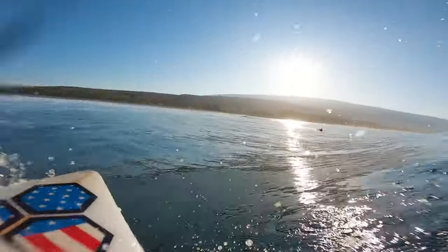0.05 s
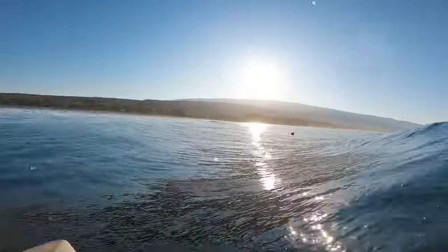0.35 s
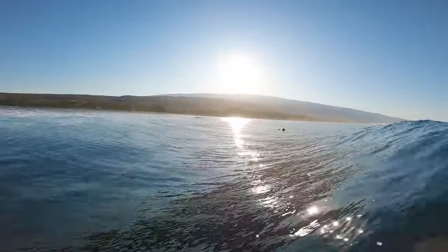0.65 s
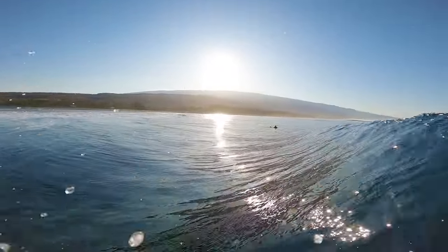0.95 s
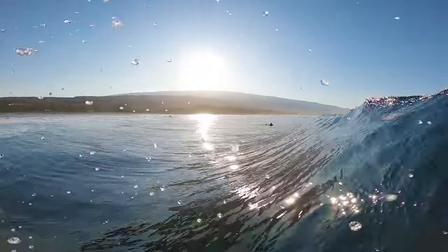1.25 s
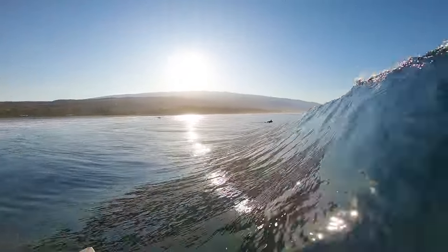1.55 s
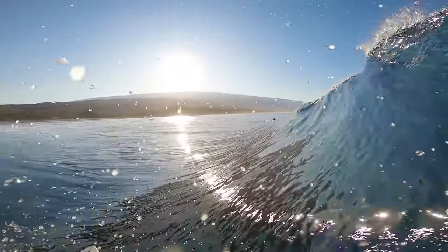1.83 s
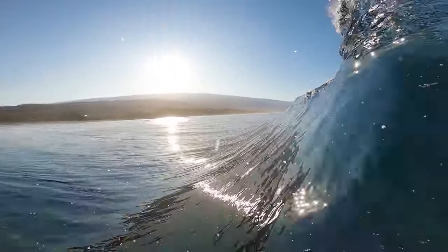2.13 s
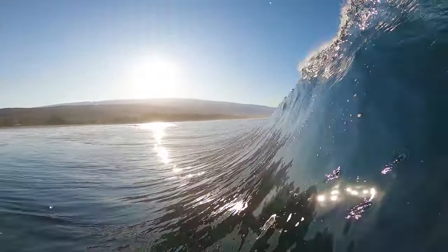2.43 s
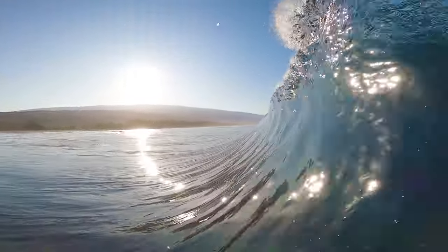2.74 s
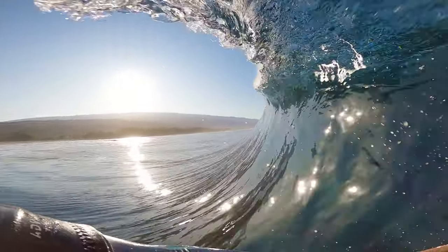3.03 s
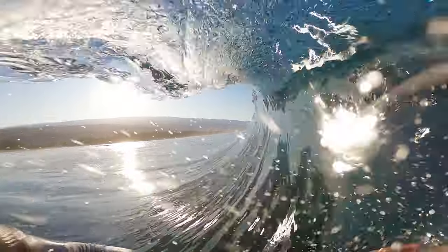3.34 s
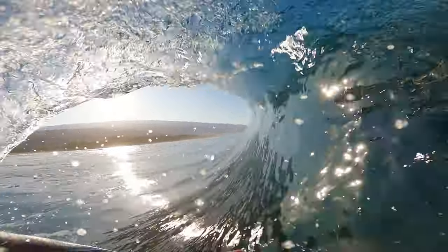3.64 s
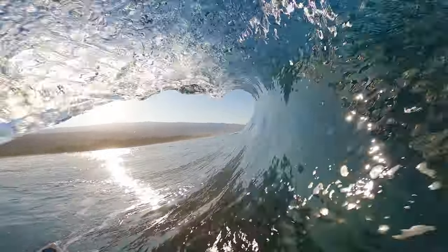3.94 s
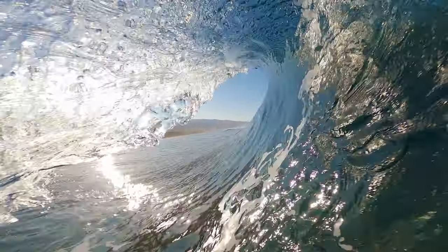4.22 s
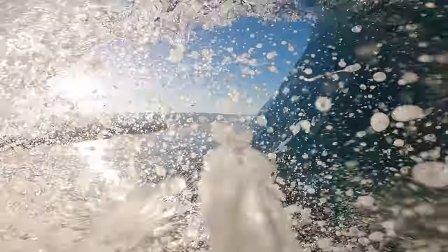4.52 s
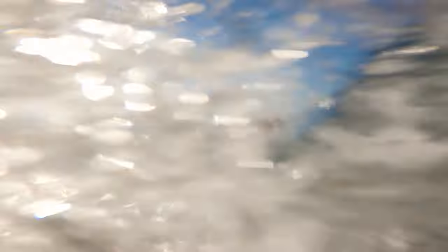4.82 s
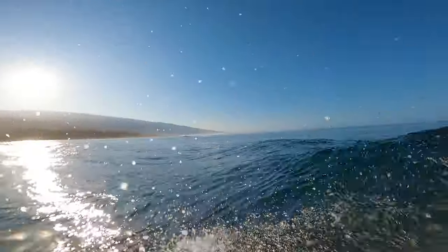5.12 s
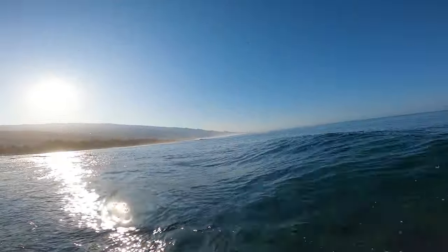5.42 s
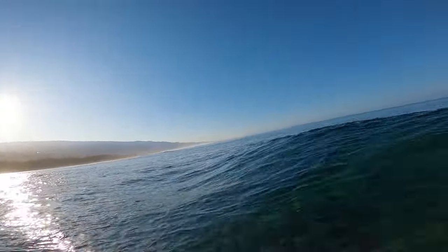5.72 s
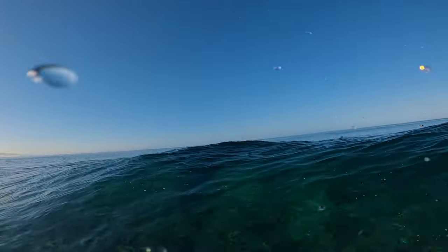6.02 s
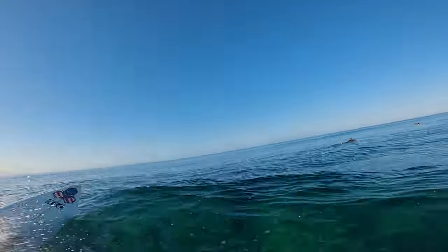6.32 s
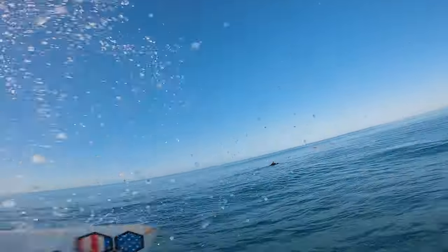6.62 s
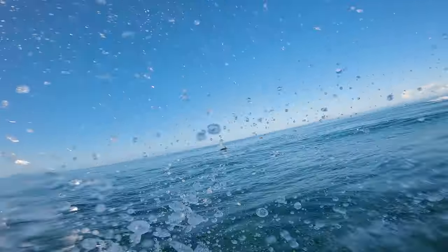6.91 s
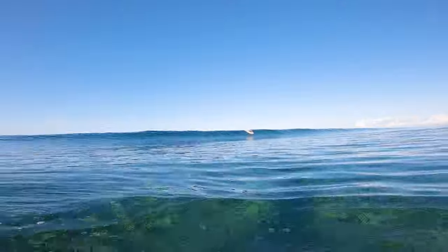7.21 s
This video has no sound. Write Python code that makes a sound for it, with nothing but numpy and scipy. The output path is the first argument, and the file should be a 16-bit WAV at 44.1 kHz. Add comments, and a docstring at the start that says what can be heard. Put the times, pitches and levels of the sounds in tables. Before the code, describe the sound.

Rushing, gurgling seawater and thumping wind on a surfer's camera, with splashes, gulps and drops hitting the wet microphone.

```python
"""Wind thumps and water gulps at the wet microphone port of a camera riding a wave with a surfer.
In the tube the wave face churns, foam fizzes, and sheets of water and single drops hit the housing.
Trapped air rings in gulps and glugs; draining water forms hollow, ringing pockets.
The lip falls on the housing, a calm glide over the shoulder follows, and a last turn throws up spray."""
import sys
import numpy as np
from scipy import signal
from scipy.fft import rfft, irfft, next_fast_len
from scipy.io import wavfile
from scipy.ndimage import uniform_filter1d, minimum_filter1d

SR = 44100
rng = np.random.default_rng(int(sys.argv[2]) if len(sys.argv) > 2 else 0)


def inscribe(sig):
    """Save sig as 16-bit PCM at rate SR to the path in sys.argv[1].

    A 1-D sig is mono; a 2-D sig holds one channel per row.
    Samples are clipped to [-1, 1] before scaling.
    """
    pcm = np.round(np.clip(np.atleast_2d(sig).T, -1, 1) * 32767)
    wavfile.write(sys.argv[1], SR, pcm.astype(np.int16))


N = 328986
T = np.arange(N) / SR


def from_db(db):
    """Decibels to gain."""
    return 10 ** (np.asarray(db) / 20)


def unit_rms(x):
    """Scale to unit power."""
    return x / np.sqrt(np.mean(x ** 2) + 1e-20)


def curves(rows):
    """Breakpoints to one per-sample curve per column."""
    times_s, *columns = np.transpose(rows)
    return [np.interp(T, times_s, column) for column in columns]


def swells(rows):
    """Sum of Gaussian bells, one curve per column of heights."""
    centre_s, half_length_s, *heights = np.transpose(rows)
    coarse_s = T[::40]
    bells = np.exp(-((coarse_s[:, None] - centre_s) / half_length_s) ** 2)
    return [np.interp(T, coarse_s, bells @ height) for height in heights]


def add(out, start_s, sound):
    """Mix a short sound in at start_s."""
    at = int(np.clip(round(start_s * SR), 0, N - 1))
    out[at:at + len(sound)] += sound[:N - at]


def colour(x, spectrum):
    """Shape by a spectrum, rolling off beyond its ends; unit power."""
    size = next_fast_len(N)
    hz, db = np.transpose(spectrum)
    bin_hz = np.maximum(np.arange(size // 2 + 1) * SR / size, 1)
    gain = from_db(np.interp(np.log(bin_hz), np.log(hz), db))
    skirts = np.minimum(1, hz[-1] / bin_hz) ** 2 * np.minimum(1, bin_hz / hz[0])
    return unit_rms(irfft(rfft(x, size) * gain * skirts, size)[:N])


def drift(rate_hz):
    """Slow random wander, unit spread."""
    hop, settle = 40, 2000
    pole = np.exp(-2 * np.pi * hop * rate_hz / SR)
    noise = rng.standard_normal(N // hop + settle + 2)
    slow = signal.lfilter([1], [1, -2 * pole, pole * pole], noise)[settle:]
    return np.interp(np.arange(N) / hop, np.arange(len(slow)), unit_rms(slow))


def steady(x, span_s):
    """Level the power over span_s; faster grain stays."""
    power = uniform_filter1d(x ** 2, max(int(span_s * SR), 2))
    return x / np.sqrt(np.maximum(power, 1e-9))


def blend(first, second, share):
    """Equal-power mix; share belongs to the first."""
    share = np.clip(share, 0, 1)
    return np.sqrt(share) * first + np.sqrt(1 - share) * second


def eddies(spectrum, rate_hz, lumpy_db):
    """Turbulence: noise in lumps."""
    return colour(rng.standard_normal(N) * from_db(lumpy_db * drift(rate_hz)), spectrum)


def impacts(per_s, spread_db):
    """Random clicks, many small, few large."""
    out = np.zeros(N)
    at = rng.integers(0, N, int(per_s * N / SR))
    level_db = spread_db * np.minimum(rng.exponential(1, len(at)), 4)
    out[at] = from_db(level_db) * rng.choice([-1, 1], len(at))
    return out


def bubbles(low_hz, high_hz, per_s, cycles, spread_db, sizes=20):
    """Bubble cloud; each rings down 60 dB in the given cycles. Unit power."""
    births = impacts(per_s, spread_db)
    size_index = rng.integers(0, sizes, N)
    out = np.zeros(N)
    for k, hz in enumerate(np.geomspace(low_hz, high_hz, sizes)):
        cosine = np.cos(2 * np.pi * hz / SR)
        r = np.exp(-np.log(1000) * hz / (cycles * SR))
        kicks = births * (size_index == k) + 1e-18
        out += hz * signal.lfilter([1, -r * cosine], [1, -2 * r * cosine, r * r], kicks)
    return unit_rms(out)


def puff(t, length_s, crest_share=0.23):
    """Air-pocket envelope: early crest, then decay."""
    age = t / (crest_share * length_s)
    return (age * np.exp(1 - age)) ** 2


# Spray bursts: centre t/s, half length/s, level/dB
SPRAY_BURSTS = [(1.248, 0.081, -63.5), (6.85, 0.055, -55.5), (6.972, 0.092, -57.5), (7.331, 0.023, -54.5)]
# Spectrum: f/Hz, level/dB
DROPLET_SPECTRUM = [(700, -10.5), (1300, -2), (3700, 6.5), (4600, -0.5), (6200, -7), (8000, -13.5),
                    (10500, -23.5), (13000, -41.5)]

def showers():
    """Thrown spray rains on the housing as tiny, briefly ringing droplets."""
    gain, = swells([(s, half_length_s, from_db(db)) for s, half_length_s, db in SPRAY_BURSTS])
    droplets = bubbles(900, 12000, per_s=2200, cycles=14, spread_db=3.2)
    return gain * steady(colour(droplets, DROPLET_SPECTRUM), span_s=0.06)


# Breaking water, swelling as the lip throws: t/s, churn/dB, fizz/dB
SURF_LEVELS = [(0, -46.5, -64.5), (0.55, -50, -61.5), (1.0, -42.5, -60), (1.55, -39, -57),
               (1.92, -35.5, -50), (2.4, -36.5, -50), (3.3, -39.5, -57.5), (3.82, -46, -59),
               (4.2, -43.5, -64), (4.42, -39, -57), (4.6, -40.5, -55), (4.92, -56, -57),
               (5.3, -61.5, -70.5), (5.76, -60.5, -79.5), (6.1, -50.5, -67.5), (6.73, -48.5, -59.5),
               (6.95, -41, -57), (7.16, -42.5, -49.5), (7.34, -36, -60.5), (7.4, -45.5, -60.5)]
# Spectra: f/Hz, level/dB
CHURN_SPECTRUM = [(450, -29.5), (750, 7), (950, 1.5), (1300, -3.5), (1700, -13.5), (2400, -28), (4500, -46)]
FIZZ_SPECTRUM = [(1000, -22), (1700, 0), (2300, -1.5), (3100, -7), (3650, -7.5), (4200, -23), (5500, -43.5),
                 (9000, -59)]
MIST_SPECTRUM = [(3000, -16), (4300, -0.5), (5300, -3.5), (6200, -6), (7000, -11.5), (8500, -18.5),
                 (10500, -31.5), (13000, -41)]

def surf(churn_trim_db=1.68, fizz_trim_db=-1.93, mist_trim_db=-2, mist_db_per_fizz_db=1.242):
    """The wave face churns with bubbles, its foam fizzes, the lip sheds mist."""
    churn_db, fizz_db = curves(SURF_LEVELS)
    plops = colour(bubbles(700, 2200, per_s=520, cycles=12, spread_db=3.2), CHURN_SPECTRUM)
    sputter = np.interp(churn_db - fizz_db, [14, 23], [0.2, 0.8])  # clear water sputters, foam washes
    churn = blend(plops, eddies(CHURN_SPECTRUM, rate_hz=22, lumpy_db=4), share=sputter)
    pops = colour(bubbles(1500, 4800, per_s=3000, cycles=12, spread_db=3), FIZZ_SPECTRUM)
    fizz = blend(pops, eddies(FIZZ_SPECTRUM, rate_hz=41, lumpy_db=2.5), share=0.13)
    mist = eddies(MIST_SPECTRUM, rate_hz=70, lumpy_db=1.9)
    return (from_db(churn_db + churn_trim_db) * churn
            + from_db(fizz_db + fizz_trim_db) * fizz
            + from_db(mist_db_per_fizz_db * fizz_db + mist_trim_db) * mist)


# Drops on the housing: t/s, level/dB, tick f/Hz
DROP_HITS = [(0.123, -41, 1400), (1.868, -30.5, 2620), (3.3707, -18, 2000), (3.556, -28, 1500),
             (3.586, -28, 2100), (4.464, -46, 3400), (4.8554, -39, 2224), (4.8904, -36, 1700),
             (5.0315, -37.5, 2370), (5.4208, -44, 1910), (5.7912, -53, 1900), (6.269, -36, 2640),
             (6.687, -38.5, 2520), (6.78, -40, 2600), (6.835, -35, 1790), (6.8414, -40, 4000),
             (6.873, -23.5, 1800), (6.895, -21, 3760), (6.904, -31, 2560), (6.983, -36, 2400),
             (7.0021, -22.5, 2020), (7.2697, -35, 2300), (7.31, -38, 2400), (7.314, -36, 2000),
             (7.3389, -25.5, 1760)]

def drops(trim_db=3.5, bandwidth_ratio=0.4, scatter_s=0.00083, knock_hz=950, knock_db=-5, knock_s=0.0018):
    """Each drop gives a damped tick, a wet knock and a trace of scattering droplets."""
    out, t = np.zeros(N), T[:SR // 50]
    knock = from_db(knock_db) * np.sin(2 * np.pi * knock_hz * t) * np.exp(-t / knock_s)
    for start_s, db, hz in DROP_HITS:
        blow = (t == 0) + 0.22 * rng.standard_normal(len(t)) * np.exp(-t / scatter_s)
        r = np.exp(-np.pi * bandwidth_ratio * hz / SR)
        ring = signal.lfilter([1, -1], [1, -2 * r * np.cos(2 * np.pi * hz / SR), r * r], blow)
        wall = signal.butter(4, 2400 + 1.08 * hz, fs=SR, output="sos")
        tick = signal.sosfilt(wall, ring)
        hit = tick / np.abs(tick).max() + signal.sosfilt(wall, knock)
        add(out, start_s, from_db(db + trim_db) * hit)
    return out


# Hollows in draining water: centre t/s, half length/s, reflection, round-trip f/Hz, glide each way/oct
WATER_POCKETS = [(3.541, 0.029, 0.33, 740, 1), (3.685, 0.09, 0.44, 950, -0.08),
                 (4.682, 0.05, 0.46, 867, 0.037), (4.799, 0.036, 0.65, 1090, 0.03),
                 (5.198, 0.077, 0.7, 923, 0.2)]

def pocket():
    """Reflection and round-trip time of the pocket nearest in time; its size shifts as it drains."""
    rows = np.array(WATER_POCKETS)
    nearest = np.argmin(np.abs(T[:, None] - rows[:, 0]), axis=1)
    centre_s, half_length_s, reflection, hz, glide_oct = rows[nearest].T
    age = (T - centre_s) / half_length_s
    trip_hz = hz * 2 ** (glide_oct * np.tanh(2 * age))
    return reflection * np.exp(-age ** 2), 1 / trip_hz


def hollow(x, echo, lag_s, bounces=4):
    """Inverted bounces inside a pocket: a moving comb of resonances."""
    return sum((-echo) ** k * np.interp(T - k * lag_s, T, x) for k in range(bounces + 1))


# Water sheets (thin, fast ones are brighter): t/s, length/s, level/dB, brightness/dB, low-pass f/Hz
WATER_SHEETS = [(0.121, 0.0043, -42.5, -6.5, 4500), (1.507, 0.0056, -51.5, -12, 3000),
                (1.529, 0.017, -57, -18, 2980), (1.773, 0.047, -38, 1.5, 3340),
                (3.357, 0.017, -39, -4, 3220), (3.464, 0.017, -52, 9, 6000), (3.493, 0.006, -40.5, 3, 6000),
                (3.526, 0.032, -40, 14.5, 3880), (3.5357, 0.004, -31.5, 8.5, 3900),
                (3.567, 0.115, -46, 3, 4300), (3.941, 0.071, -46, -0.5, 4540),
                (4.05, 0.078, -49.5, 1.5, 4000), (4.22, 0.14, -48, 4.5, 4100),
                (4.669, 0.019, -40, 1.5, 5550), (4.749, 0.041, -49, 6, 6500),
                (4.764, 0.0044, -32, -4.5, 6000), (4.86, 0.02, -38.5, 1, 7200), (4.901, 0.01, -33, 0, 8000),
                (4.956, 0.0035, -44, 1.5, 6000), (5.065, 0.0061, -48, -1, 4500),
                (5.085, 0.0045, -58, -12.5, 4500), (5.111, 0.026, -39, 1, 9000),
                (5.145, 0.084, -50.5, 10, 4400), (5.185, 0.0026, -43, 12.5, 5100),
                (5.3, 0.0043, -69, -23, 1980), (6.862, 0.033, -51, -8.5, 7500),
                (6.98, 0.011, -56, -13, 4000), (7.337, 0.014, -39.5, 2.5, 6000),
                (7.362, 0.015, -46.5, 2, 5500)]
# Spectra: f/Hz, level/dB
SLAP_SPECTRUM = [(300, -26), (650, 20), (1000, 8.5), (1500, -2.5), (2200, -31), (4000, -49)]
SPATTER_SPECTRUM = [(900, -8), (1500, 4), (2600, -4), (3200, -30), (5000, -39)]
SPRAY_SPECTRUM = [(2000, -15), (2900, 0), (3850, -3), (4600, -11.5), (6000, -13.5), (7500, -25),
                  (13000, -37)]

def splashes(slap_db=15, spatter_db=-0.5, spray_db=-13, min_rise_s=0.00066, max_drain_s=0.018):
    """Sheets drum on the housing as impacts and bubbles, then drain; in a pocket they ring and tear."""
    echo, lag_s = pocket()
    plops = bubbles(550, 2000, per_s=1200, cycles=20, spread_db=3)
    slap = colour(hollow(plops, echo, lag_s), SLAP_SPECTRUM)
    ringing = bubbles(1300, 5200, per_s=700, cycles=45, spread_db=3, sizes=32)
    clicks = unit_rms(impacts(per_s=6000, spread_db=3))
    patter = hollow(blend(ringing, clicks, share=0.5 * echo), echo, lag_s)
    spatter, spray = colour(patter, SPATTER_SPECTRUM), colour(patter, SPRAY_SPECTRUM)
    blobs = steady(from_db((1.8 + 3 * echo) * drift(110)), span_s=0.02)
    bands = blobs * np.array([steady(band, span_s=0.012) for band in (slap, spatter, spray)])
    out = np.zeros(N)
    for start_s, length_s, db, bright_db, top_hz in WATER_SHEETS:
        gains = from_db(db + np.array([slap_db - bright_db, spatter_db, spray_db + bright_db]))
        at = int(start_s * SR)
        water = gains @ bands[:, at:at + SR // 2]
        t = T[:len(water)]
        rise = np.minimum(t / max(min_rise_s, 0.092 * length_s), 1)
        drain = np.exp(-np.maximum(t - length_s, 0) / min(0.28 * length_s, max_drain_s))
        wet_port = signal.butter(8, top_hz, fs=SR, output="sos")  # wetter is duller
        add(out, start_s, signal.sosfilt(wet_port, water * rise * drain))
    return out


# Water closing over the port: t/s, level/dB, start f/Hz, final f/Hz, length/s
PORT_CLOSURES = [(0.133, -12, 133, 65, 0.066), (0.282, -10.5, 456, 153, 0.011),
                 (1.861, -8.5, 327, 142, 0.047), (3.378, -7.5, 970, 500, 0.013),
                 (4.812, -7, 584, 190, 0.052), (4.957, -12.5, 570, 100, 0.018),
                 (5.024, -16, 500, 149, 0.019), (5.07, -8.5, 774, 99, 0.015),
                 (5.084, -10.5, 880, 111, 0.027), (5.126, -8.5, 980, 105, 0.0184),
                 (5.156, -13, 717, 99, 0.0299), (5.303, -16.5, 766, 296, 0.0084),
                 (6.703, -8, 550, 147, 0.017), (6.779, -10.5, 572, 220, 0.029)]

def glugs(trim_db=-5.5, fall_share=0.299):
    """Water loads the air in the port; its ring drops from a plop to a thump."""
    out, t = np.zeros(N), T[:SR // 6]
    for start_s, db, start_hz, final_hz, length_s in PORT_CLOSURES:
        hz = final_hz + (start_hz - final_hz) * np.exp(-t / (fall_share * length_s))
        ring = np.sin(2 * np.pi * np.cumsum(hz) / SR)
        add(out, start_s, from_db(db + trim_db) * np.sqrt(puff(t, length_s)) * ring)
    return out


# Trapped air at the port: t/s, level/dB, start f/Hz, length/s
AIR_POCKETS = [(0.077, -13.5, 360, 0.032), (0.093, -11, 428, 0.039), (0.122, -7.5, 620, 0.01),
               (0.35, -12, 388, 0.032), (1.011, -18, 651, 0.048), (1.209, -8.5, 234, 0.033),
               (1.502, -14, 720, 0.017), (1.597, -12.5, 730, 0.029), (1.795, -21, 1500, 0.011),
               (2.294, -19.5, 1420, 0.0082), (3.38, -15.5, 1224, 0.0092), (3.443, -10, 553, 0.019),
               (3.48, -3, 670, 0.0058), (3.49, -11, 572, 0.03), (3.539, -7, 860, 0.0083),
               (3.551, -6.5, 700, 0.012), (4.676, -8.5, 614, 0.013), (4.692, -28.5, 1380, 0.009),
               (4.809, -23, 1110, 0.012), (4.847, -8, 370, 0.027), (4.853, -6, 490, 0.02),
               (5.014, -11, 398, 0.023), (5.145, -35, 2130, 0.012), (5.185, -15.5, 584, 0.017),
               (5.217, -40, 2570, 0.0088), (5.249, -36, 1520, 0.015), (5.32, -12, 342, 0.013),
               (5.364, -15.5, 526, 0.013), (6.686, -6.5, 473, 0.02), (6.902, -11.5, 301, 0.094),
               (7.18, -12, 314, 0.029)]

def gulps(trim_db=-3, glide=0.018):
    """Trapped air swells, rings briefly and rises in pitch as it escapes."""
    out, t = np.zeros(N), T[:SR // 6]
    for start_s, db, hz, length_s in AIR_POCKETS:
        ring = np.sin(2 * np.pi * hz * t * (1 + glide * t / length_s))
        add(out, start_s, from_db(db + trim_db) * puff(t, length_s) * ring)
    return out


def swirl(centre_hz=470, wander=0.16, width_hz=36):
    """A swirling cavity over the port rings in a narrow band that wanders with its size."""
    hz = centre_hz * np.exp(2 * wander * np.tanh(drift(3)))
    phase = 2 * np.pi * np.cumsum(hz) / SR
    return drift(width_hz) * np.cos(phase) + drift(width_hz) * np.sin(phase)


# Spectrum: f/Hz, level/dB
ROAR_SPECTRUM = [(100, -20.5), (200, 1.5), (270, 3), (400, -2), (500, -0.5), (620, -1), (720, -7),
                 (850, -15.5), (1100, -26.5), (1700, -58.5), (3000, -84)]

def water_roar():
    """Water gurgles across the port: swirl, large short-lived bubbles, eddies."""
    cavities = blend(swirl(), bubbles(190, 820, per_s=600, cycles=19, spread_db=2.5), share=0.25)
    wash = eddies(ROAR_SPECTRUM, rate_hz=15, lumpy_db=2)
    return steady(blend(colour(cavities, ROAR_SPECTRUM), wash, share=0.68), span_s=0.08)


# Spectrum in light wind: f/Hz, level/dB
WIND_SPECTRUM = [(25, -15), (46, 2.5), (79, 5.5), (120, 2), (175, 0), (250, -16), (420, -20.5), (850, -66)]

def wind_buffet(wind_db, light_db=-23.5, strong_db=-15, strong_pitch_ratio=1.176):
    """Wind thumps on the port; stronger wind sheds eddies faster and sounds higher. Unit power."""
    strength = (wind_db - light_db) / (strong_db - light_db)
    raised_spectrum = [(hz * strong_pitch_ratio, db) for hz, db in WIND_SPECTRUM]
    strong = eddies(raised_spectrum, rate_hz=21, lumpy_db=1.5)
    light = eddies(WIND_SPECTRUM, rate_hz=13, lumpy_db=-0.4)
    return steady(blend(strong, light, share=strength), span_s=0.099)


# Flow through tube, shoulder and last turn: t/s, wind/dB, roar/dB
FLOW_LEVELS = [(0, -14.5, -20.5), (0.42, -33, -25.5), (0.66, -27, -28), (1.08, -22.5, -21.5),
               (1.3, -19, -17.5), (1.68, -19, -21.5), (2.0, -18.5, -17.5), (2.3, -18, -22.5),
               (2.6, -15, -20), (3.28, -14, -17), (3.7, -15, -18.5), (4.9, -14, -16.5), (5.22, -22, -30.5),
               (5.6, -32.5, -33.5), (5.95, -29, -31.5), (6.55, -31.5, -32), (7.18, -26, -21),
               (7.46, -21.5, -21)]
# Surges from chop and board turns: centre t/s, half length/s, wind rise/dB, roar rise/dB
FLOW_SURGES = [(0.29, 0.055, 5.5, -2), (0.87, 0.036, -2, 1.5), (1.35, 0.038, 2.5, 2.5),
               (1.88, 0.064, 3, -1), (2.97, 0.034, 8, 1.5), (3.2, 0.083, 1.5, 1), (4.75, 0.015, 3, 4.5),
               (4.85, 0.039, 3, 2.5), (5.32, 0.026, -2, 8), (6.26, 0.15, 7.5, 1), (6.7, 0.079, 10, 4.5),
               (6.81, 0.039, 1, 5.5), (6.91, 0.11, 11.5, 1), (7.34, 0.052, 4, 6)]
# Deepest rumble: f/Hz, level/dB
HEAVE_SPECTRUM = [(10, -12.5), (25, 8), (45, 1.5), (70, -16), (150, -35.5)]

def port_flow(wind_trim_db=-2.5, roar_trim_db=-1.58, heave_trim_db=-17.5, heave_db_per_wind_db=0.62):
    """Air and water surge past the port over a deep heave that follows the wind."""
    wind_db, roar_db = curves(FLOW_LEVELS)
    gust_db, wash_db = swells(FLOW_SURGES)
    gusty_db = wind_db + gust_db
    wind = wind_buffet(wind_db)
    heave = steady(eddies(HEAVE_SPECTRUM, rate_hz=3.3, lumpy_db=2), span_s=0.25)
    return (from_db(gusty_db + wind_trim_db) * wind
            + from_db(heave_db_per_wind_db * gusty_db + heave_trim_db) * heave
            + from_db(roar_db + wash_db + roar_trim_db) * water_roar())


# Brief level dips, mostly just after a slap: centre t/s, half length/s, depth/dB
RUSH_DIPS = [(3.41, 0.03, 4), (3.59, 0.031, 3.5), (4.718, 0.014, 3.5), (4.99, 0.022, 15),
             (5.055, 0.01, 11.5), (6.745, 0.022, 4)]

def scene():
    """Mono sum at the port; only flow and surf dip."""
    dip_db, = swells(RUSH_DIPS)
    rush = from_db(-dip_db) * (port_flow() + surf())
    return (rush + splashes() + gulps() + glugs() + drops() + showers())[None]


def record(dry):
    """Look-ahead limiter on the biggest thumps, then a steep low-pass."""
    ceiling, window, stopband_hz = 0.78, SR // 80, 13000
    gain = minimum_filter1d(ceiling / np.maximum(np.abs(dry), ceiling), 2 * window)
    gain = uniform_filter1d(uniform_filter1d(gain, window), window)
    lowpass = signal.cheby2(12, 70, stopband_hz, fs=SR, output="sos")
    return signal.sosfilt(lowpass, dry * gain)


dry = scene()
out = record(dry)
inscribe(out)
```